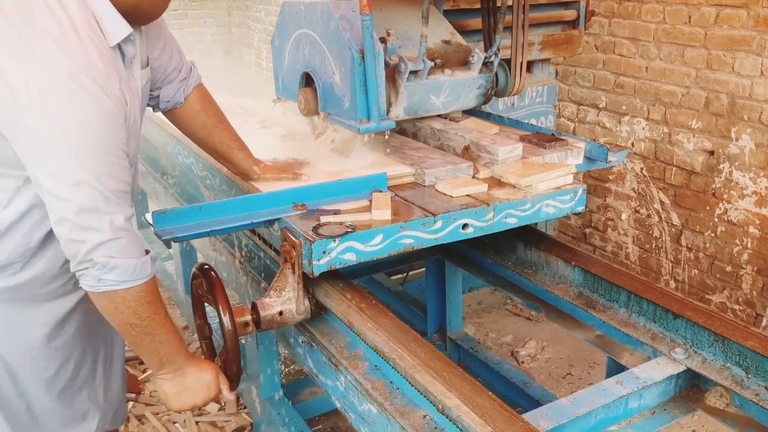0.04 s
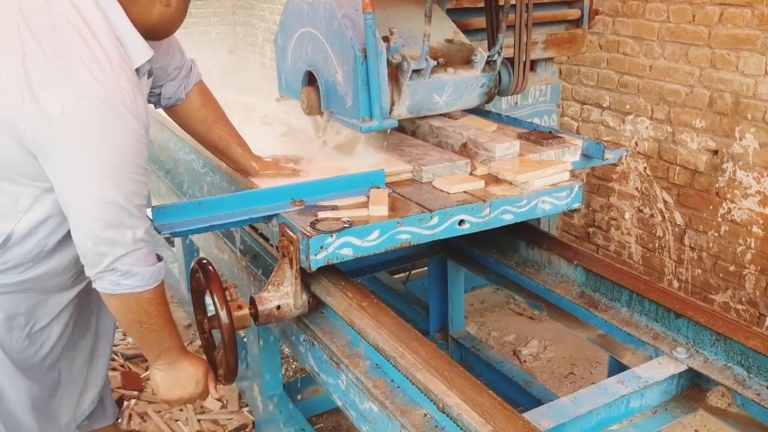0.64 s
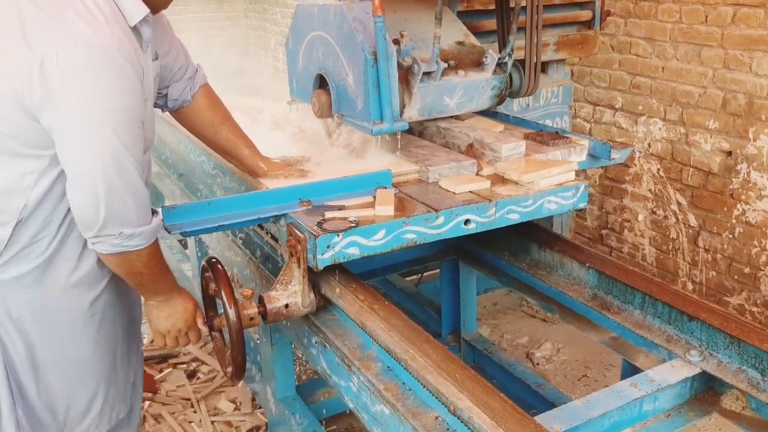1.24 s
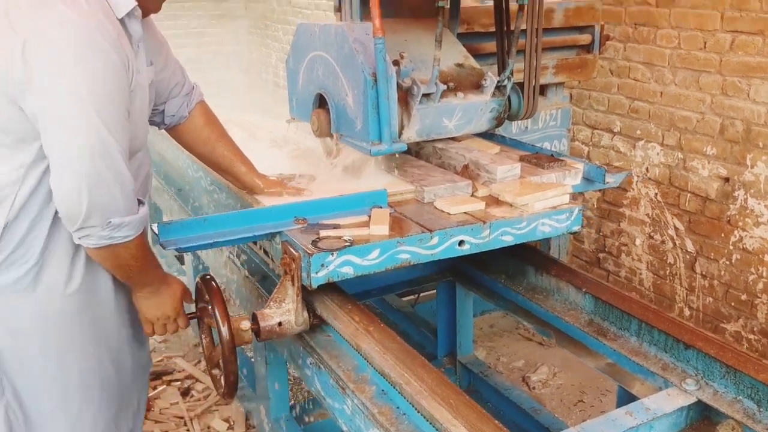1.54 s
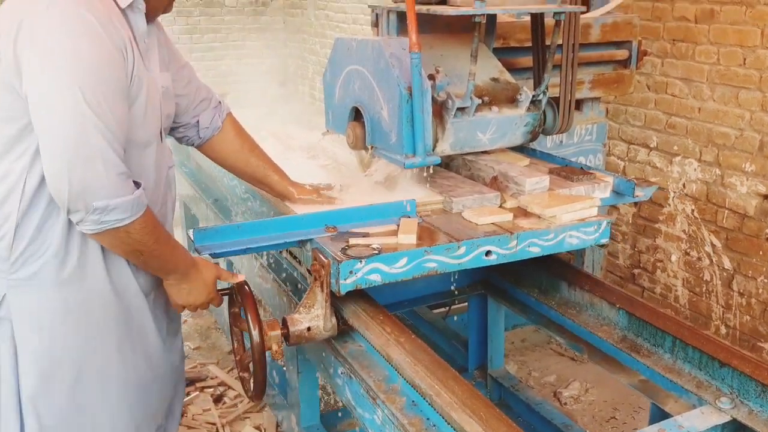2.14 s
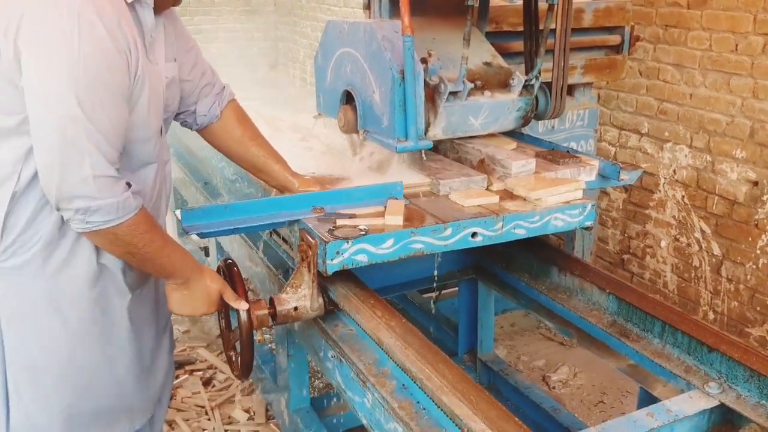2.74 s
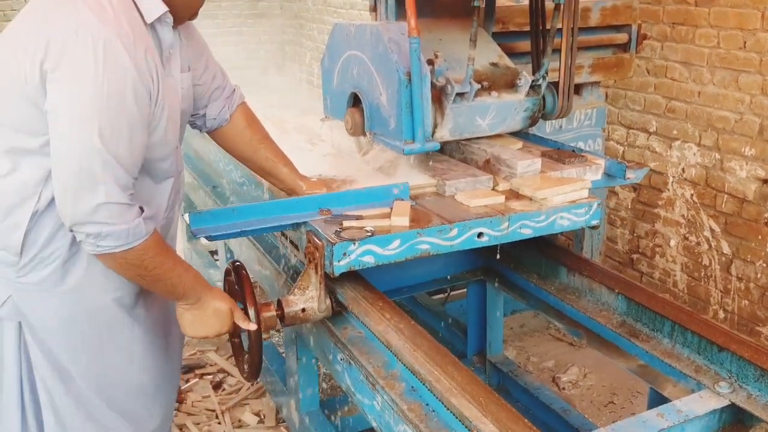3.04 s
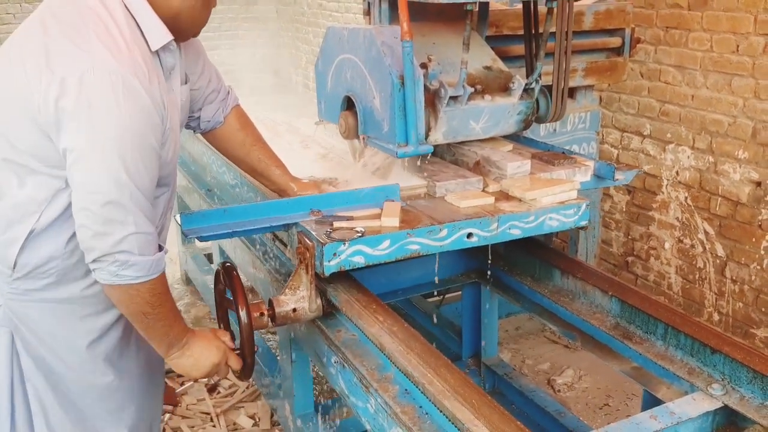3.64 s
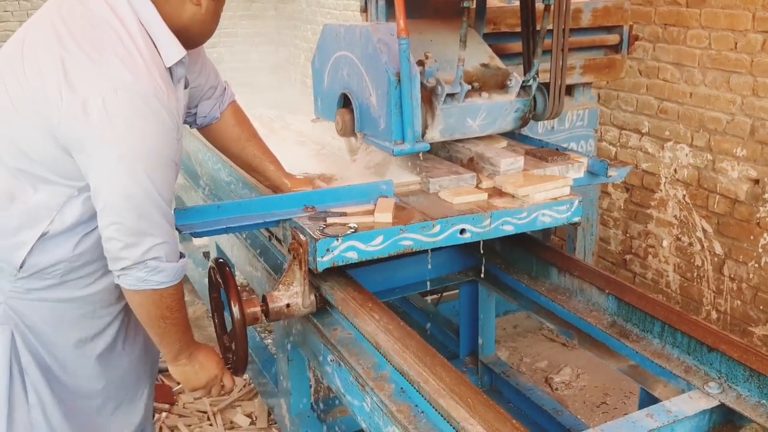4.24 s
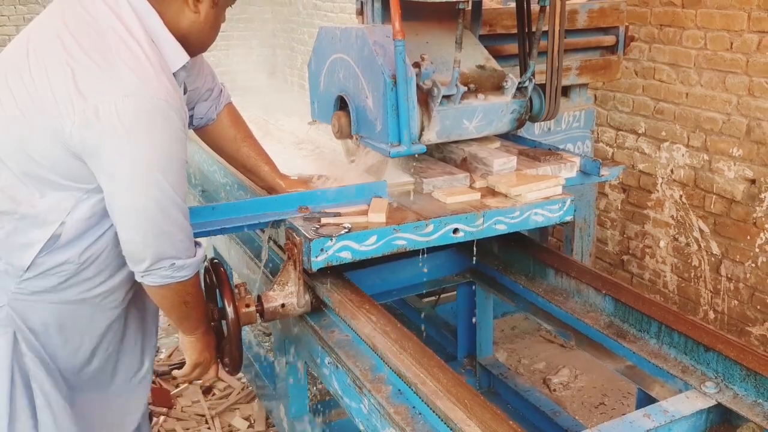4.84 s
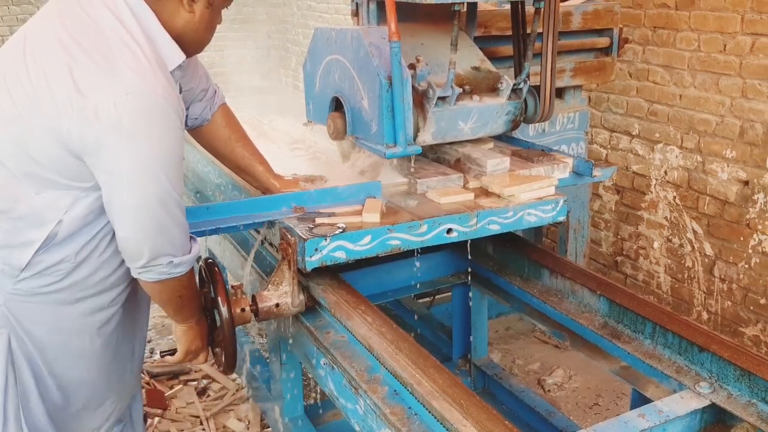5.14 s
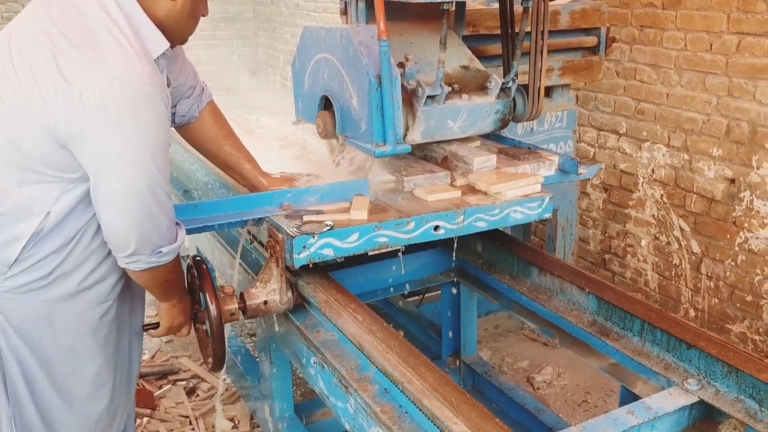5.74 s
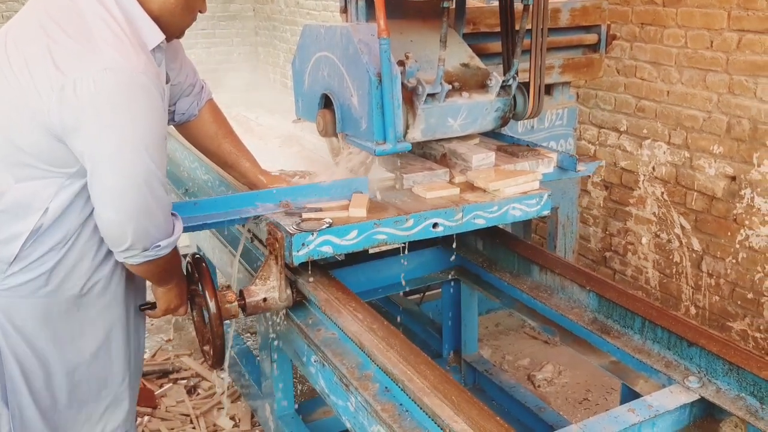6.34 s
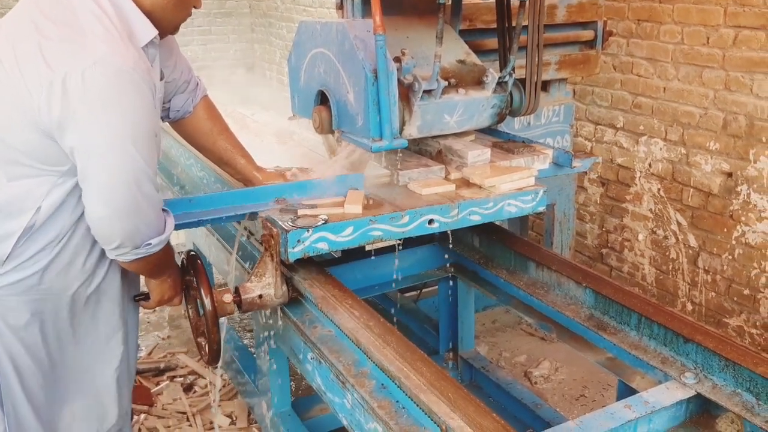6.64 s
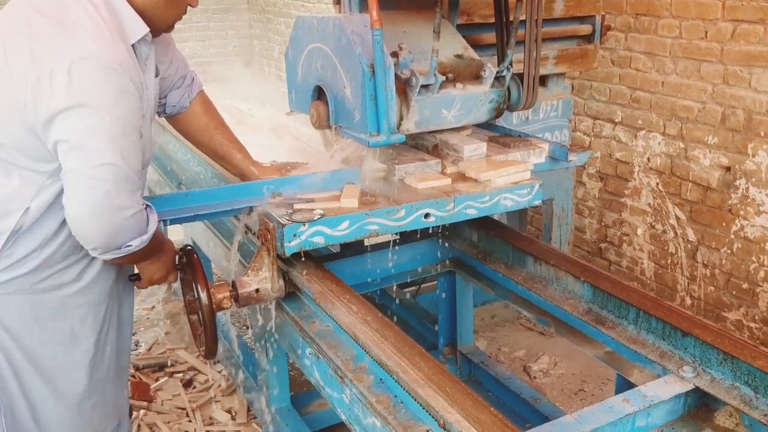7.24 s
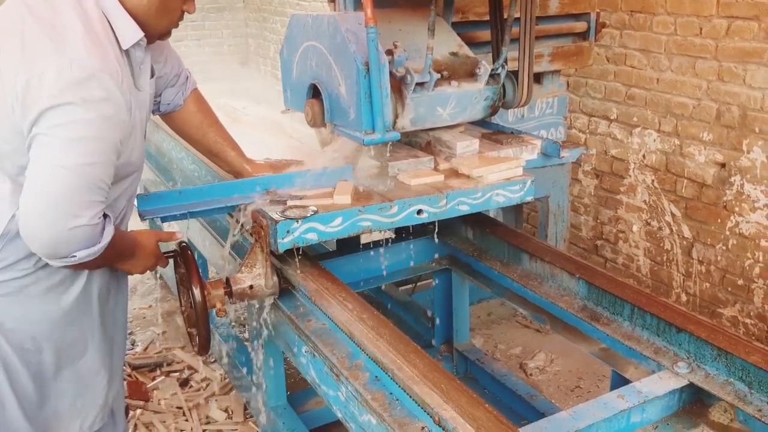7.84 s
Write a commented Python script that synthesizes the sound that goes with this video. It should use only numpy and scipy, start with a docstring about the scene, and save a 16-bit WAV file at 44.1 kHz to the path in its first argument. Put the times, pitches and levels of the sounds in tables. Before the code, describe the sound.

A water-cooled circular saw cuts tile nearby in a brick workshop, making a loud, continuous grinding hiss. The steel blade rings and screeches at shifting pitches over a hollow machine drone and fine water spray. Past the middle the load eases, the pitch rises slightly and a slowly pulsing motor whine stands out while the hiss goes on. The carriage gives a few dull knocks underneath.

```python
"""A water-cooled bridge saw is hand-fed through a tile in a brick workshop.
From the start the rim grinds a loud hiss that partly repeats each turn, the guard booms, and the steel
blade sings on multiples of its speed. The feed bites and slips; the carriage knocks now and then.
Near 3 s the load eases and the blade speeds up; each stage of the cut brings new overtones.
From 5.5 s the blade comes free and the motor's beating whine stands out. A low hum joins at 7.5 s."""
import sys
import numpy as np
from scipy import signal
from scipy.fft import rfft, irfft, next_fast_len
from scipy.io import wavfile
from scipy.ndimage import map_coordinates

SR = 44100
rng = np.random.default_rng(int(sys.argv[2]) if len(sys.argv) > 2 else 0)


def master_out(mix):
    """Clip the mix to full scale and print it as 16-bit PCM to the path in sys.argv[1]."""
    frames = np.transpose(np.atleast_2d(mix))
    ceiling = np.clip(frames, -1, 1)
    pcm = np.round(ceiling * 32767).astype(np.int16)
    wavfile.write(sys.argv[1], SR, pcm)


N = 347508
NOMINAL_RPS = 41.2  # blade speed, medium load
TOP_MULTIPLE = 185  # of blade speed

# Rim on tile: (frequency [Hz], relative density [dB])
RIM_SPECTRUM = [(1290, -25.5), (2200, -16), (2450, -7.5), (2810, -6.5), (3050, -2.5), (3370, -3),
                (3740, -4), (4830, -1), (5740, -1.5), (6210, 0), (7250, -2.5), (8600, -17), (11200, -46),
                (18900, -120)]
def grinding(turns, level_db=-20.5):
    """The diamond rim scratches the tile into a hiss."""
    return amp(level_db) * coloured(grit(turns, repeat=0.27, life_turns=28), RIM_SPECTRUM)


def grit(turns, repeat, life_turns, points=1024):
    """Two scratch noises; a share repeats each turn as the same diamonds come round and wear."""
    survival = np.exp(-1 / life_turns)
    laps = rng.standard_normal((2, int(turns[-1]) + 2, points))
    laps[:, 0] /= np.sqrt(1 - survival ** 2)  # rim starts worn in
    rim = signal.lfilter([1], [1, -survival], laps, axis=1).reshape(2, -1)
    repeating = unit(np.array([map_coordinates(side, [turns * points]) for side in rim]))
    return np.sqrt(repeat) * repeating + np.sqrt(1 - repeat) * rng.standard_normal((2, N))


# Hand bites (+) and slips (-): (time [s], length [s], gain [dB])
FEED_EVENTS = [(.11, .04, -1), (.15, .04, 0.5), (0.195, .05, -2.5), (0.608, 0.049, -3), (1.453, 0.04, -3.5),
               (2.695, 0.11, 1.2), (2.97, .04, -1.3), (3.05, .08, 1.3), (5.286, 0.11, 1.5),
               (5.8, 0.045, -1.5), (6.14, 0.032, -3), (6.39, .15, 0.2), (7.096, .06, 1.3),
               (7.23, .06, -0.2), (7.595, .06, -1), (7.73, .06, -1.7)]
def feed(turns, belt_db=0.06, belt_lap_turns=6.2, chatter_db=0.2, surge_db=0.5, crumble_db=0.72):
    """Gain from rim pressure: uneven hand, belt pull, blade swing, tile giving way."""
    t = np.arange(N) / SR
    hand = sum(db * np.exp(-(2 * (t - at) / length) ** 2) for at, length, db in FEED_EVENTS)
    belt = belt_db * np.sin(2 * np.pi * (turns / belt_lap_turns + rng.random()))
    chatter = chatter_db * np.cos(2 * np.pi * turns)
    tile = surge_db * wobble(15) + crumble_db * wobble(70)
    return amp(hand + belt + chatter + tile)


# Loud blade notes: (start [s], stop [s], multiple of speed, level [dB], left-right [dB])
BLADE_NOTES = [(0, 5.5, 11, -45, -2), (0, 1.6, 12, -45.5, -20), (0, 2.7, 16, -46, -11),
               (0, 1.4, 19, -35, 0), (0, 2.73, 25, -41.5, -9), (0, 2.9, 50, -41.5, -9),
               (0, 1.4, 75, -38, -6), (0, 2.85, 81, -42, -2), (0, 1.55, 104, -35, -10),
               (0, 1, 121, -42, -12), (0, 3.3, 119, -45, -12), (0, 3.5, 122, -31.5, -1),
               (0, 2.8, 155, -42, -12), (.1, 1.84, 149, -37, -19), (1, 1.53, 21, -33.5, -8),
               (1.4, 2.95, 100, -39, -7), (1.55, 3.1, 21, -35, -2), (1.5, 2.34, 19, -41, 2),
               (1.6, 2.9, 27, -37.5, 6), (2.85, 3.25, 24, -35, 11), (2.85, 5.5, 25, -32, -6),
               (2.9, 5.5, 16, -37.5, -2), (2.9, 6.9, 84, -38.5, -6), (3.1, 6.6, 21, -46, 6),
               (3.1, 5.5, 111, -41, -17), (3.15, 5.6, 130, -45, -15), (3.25, 5.6, 24, -38.5, 13),
               (3.3, 7.88, 27, -44, -4), (5.2, 7.2, 9, -46.5, -2), (5.25, 7.88, 74, -38.5, 10),
               (5.5, 5.85, 16, -36, 4), (5.5, 6.85, 25, -31, 8), (5.5, 6.9, 115, -39, -14),
               (5.55, 6.6, 11, -39, -2), (6.6, 7.15, 11, -35.5, -2), (5.6, 6.7, 24, -36.5, 10),
               (5.6, 6.8, 50, -39, 16), (5.85, 7.26, 16, -41, 5), (6.68, 7.1, 20, -33, -3),
               (6.85, 8.9, 25, -38, -7), (6.9, 6.2, 145, -32, -15), (7.1, 7.6, 122, -37, -14),
               (7.2, 7.88, 17, -35, -6)]
def singing(turns, trim_db=-0.5):
    """Blade modes ring on multiples of the speed; high ones flutter more."""
    out = np.zeros((2, N))
    for start, stop, multiple, db, pan_db in BLADE_NOTES:
        flutter_db = np.interp(multiple, [0, TOP_MULTIPLE], [1.66, 3.3])
        span, sound = note(turns, start, stop, multiple, db + trim_db, pan_db, flutter_db, fade_s=0.2)
        out[:, span] += sound
    return out


def note(turns, start, stop, multiple, db, pan_db, flutter_db, fade_s):
    """One fluttering blade note: sample span and sound."""
    span, envelope = swell(start, stop, fade_s)
    level = amp(db + flutter_db * wobble(14, len(envelope)))
    return span, envelope * level * tone(turns[span], multiple, multiple * NOMINAL_RPS, pan_db)


# Spray hiss: (frequency [Hz], relative density [dB])
SPRAY_SPECTRUM = [(4820, -17), (8200, -3), (8620, -2.5), (13300, 1), (15100, -1.5), (16000, -16.5)]
# Spray strength: (time [s], relative level [dB])
SPRAY_LEVEL = [(0.0, -27), (5.42, -25.5), (6.47, -27), (6.67, -25.5), (7.73, -27.5), (7.88, -24.5)]
def spray(turns, level_db=-25.5):
    """The rim flings off water and slurry."""
    flow_db = curve(SPRAY_LEVEL)
    mist = coloured(grit(turns, repeat=0.086, life_turns=12), SPRAY_SPECTRUM)
    return amp(level_db + flow_db - flow_db.mean()) * mist


# Steel disc: (frequency [Hz], relative density [dB])
DISC_SPECTRUM = [(1200, -32.5), (1680, -18), (1830, -0.5), (1920, -9.5), (2015, 1), (2140, -3), (2240, -6),
                 (2500, -4), (3200, -35)]
def rubbing(turns, rps, level_db=-33, db_per_rps=2, wander_db=2.2):
    """The blade's flank rubs the slot, louder with speed."""
    db = level_db + db_per_rps * (rps - NOMINAL_RPS) + wander_db * wobble(12)
    return amp(db) * coloured(grit(turns, repeat=0.36, life_turns=29), DISC_SPECTRUM)


# Blade guard: (frequency [Hz], relative density [dB])
GUARD_SPECTRUM = [(400, -58), (610, -24), (670, -8.5), (730, -12), (810, -5), (930, -3), (1020, -4.5),
                  (1130, -5.5), (1300, -14), (1470, -9), (1650, -11.5), (2300, -43)]
# Guard boom: (time [s], level [dB])
GUARD_LEVEL = [(0, -35.5), (.9, -36), (1.2, -36.5), (2.6, -35), (3.05, -36), (3.3, -36.5), (4.8, -35.5),
               (5.75, -34.5), (7, -33), (7.25, -36), (7.88, -33)]
def guard(turns, trim_db=4, runout_db=1.5):
    """The slightly bent blade rubs once a turn and rings its guard."""
    pulse = unit(amp(runout_db * np.cos(2 * np.pi * turns)))
    boom = coloured(grit(turns, repeat=0.35, life_turns=83), GUARD_SPECTRUM)
    return amp(curve(GUARD_LEVEL) + trim_db) * pulse * boom


# Tile and disc modes: (start [s], stop [s], frequency [Hz], width [Hz], level [dB])
SCREECHES = [(0, .55, 4960, 120.6, -32), (.75, 1.4, 4250, 70, -37), (1, 1.45, 1015, 110, -32),
             (1.601, 2.65, 4930, 80.5, -35), (1.998, 3, 4240, 121, -36), (2.602, 3.1, 4950, 100, -29),
             (2.902, 3.197, 1016, 129.6, -30), (3.7, 5.305, 3410, 110, -41.5), (3.899, 5.5, 6270, 171, -34),
             (4.2, 5.6, 5400, 110.8, -34.5), (5.104, 6.2, 1271, 69.9, -38), (4.901, 6.699, 904, 139.6, -37),
             (5.2, 6.3, 3480, 201, -36), (5.7, 7.1, 2020, 59.9, -38), (6.65, 7.05, 3420, 119, -31),
             (6.95, 7.35, 6150, 170, -30), (7.002, 7.3, 5560, 397, -29)]
def screeching():
    """Damped modes, driven by the grinding, ring as narrow rough bands."""
    out = np.zeros((2, N))
    for start, stop, hz, width_hz, db in SCREECHES:
        span, envelope = swell(start, stop, fade_s=0.2)
        count = len(envelope)
        roughness = wobble(width_hz, count) + 1j * wobble(width_hz, count)
        ring = roughness * np.exp(2j * np.pi * hz * np.arange(count) / SR)
        lead = np.array([[np.exp(1j * at_hz(PHASE_LEAD, hz))], [1]])
        out[:, span] += envelope * amp(db) * pan(at_hz(BALANCE, hz)) * np.real(lead * ring)
    return out


# Blade speed by load: (heavy [rev/s], medium [rev/s], light [rev/s])
LOAD_RPS = [40.75, 41.2, 41.9]
# Drive tones by load: (multiple of speed, heavy [dB], medium [dB], light [dB], left-right [dB])
MOTOR_TONES = [(8.82, -55.2, -51.1, -44.1, -6.3), (18.63, -55.8, -47.1, -42.9, -1.4),
               (24.47, -45, -38.5, -41.5, -1.3), (25.55, -42.0, -39.9, -48.2, 0.2),
               (28.45, -46.0, -42.4, -36.5, -3.3), (30.45, -44.5, -39, -32.3, 2.5),
               (33.36, -45.2, -37.6, -44.7, 2.2), (35.39, -37.3, -35.3, -35.3, 1.5),
               (43.2, -43, -45.7, -48.4, -9.1), (45.13, -42.7, -45.5, -47.1, -6.0),
               (48.13, -46.9, -41.4, -38.4, 2.0), (48.7, -46.1, -38.2, -45.2, 5.0)]
def motor(turns, rps, flutter_db=1.2):
    """Motor and belt tones follow the load."""
    out = np.zeros((2, N))
    for multiple, *load_db, pan_db in MOTOR_TONES:
        level = amp(np.interp(rps, LOAD_RPS, load_db) + flutter_db * wobble(7))
        out += level * tone(turns, multiple, multiple * NOMINAL_RPS, pan_db)
    return out


def whine(turns, rps, loaded_db=-37.5, free_db=-28.5, db_per_rps=9,
          beat_db=4.1, beat_s=0.92, crest_s=6.75):
    """The motor's slot tone grows to a slowly beating whine as the blade comes free."""
    free = np.interp(rps, [41.45, 41.7], [0, 1])
    beat = beat_db * np.cos(2 * np.pi * (np.arange(N) / SR - crest_s) / beat_s)
    running_db = free_db + db_per_rps * (rps - LOAD_RPS[2]) + beat
    db = (1 - free) * loaded_db + free * running_db + 0.1 * wobble(11)
    return amp(db) * tone(turns, multiple=23.55, hz=990, pan_db=-10 * free)


# Stages of the cut: (start [s], stop [s], overtone base level [dB])
CUT_STAGES = [(0, 1.5, -41.5), (1.55, 2.8, -44.5), (3, 5.55, -40.5), (5.55, 7.1, -43), (7.1, 11, -43)]
def overtones(turns, count=16, lowest_multiple=72, scatter_db=0.6):
    """Faint blade notes between the loud ones, coloured like the grinding, redrawn each stage."""
    out = np.zeros((2, N))
    vacant = np.setdiff1d(np.arange(lowest_multiple, TOP_MULTIPLE), [row[2] for row in BLADE_NOTES])
    for start, stop, stage_db in CUT_STAGES:
        for group in np.array_split(vacant, count):
            multiple = rng.choice(group)
            hz = multiple * NOMINAL_RPS
            db = stage_db + at_hz(RIM_SPECTRUM, hz) + rng.normal(0, scatter_db)
            pan_db = at_hz(BALANCE, hz) - 2
            span, sound = note(turns, start, stop, multiple, db, pan_db, flutter_db=4, fade_s=0.28)
            out[:, span] += sound
    return out


# Carriage knocks: (time [s], level [dB])
KNOCK_EVENTS = [(0.339, -32), (0.451, -33), (0.691, -28), (1.74, -30), (2.17, -28), (2.39, -31),
                (5.39, -27), (6.779, -19.5), (7.16, -28), (7.26, -27)]
# Carriage modes: (frequency [Hz], relative level [dB], T60 [s])
CARRIAGE_MODES = [(44, -19, .16), (66, -3, .14), (94, -6.5, 0.14), (128, 2, 0.13), (174, 2, 0.043),
                  (242, 3, 0.095), (334, -6, .06)]
def knocks(trim_db=-9, attack_s=0.001, scatter_db=2.2, pan_db=-7):
    """The carriage thuds on its rails, ringing its low modes at new strengths each time."""
    out = np.zeros(N + SR)
    t = np.arange(SR // 3) / SR
    attack = 1 - np.exp(-t / attack_s)
    for at, db in KNOCK_EVENTS:
        ring = np.zeros(len(t))
        for hz, mode_db, t60 in CARRIAGE_MODES:
            decay = amp(mode_db + rng.normal(0, scatter_db) - 60 * t / t60)
            ring += decay * np.sin(2 * np.pi * (hz * t + rng.random()))
        out[round(at * SR):][:len(t)] += amp(db + trim_db) * attack * ring
    return out[:N] * pan(pan_db)


# Frame and belts: (frequency [Hz], relative density [dB])
FRAME_SPECTRUM = [(18, -65), (32, -40), (60, -20), (97, -6), (150, -11.5), (200, -3.5), (245, 1.5),
                  (300, -1.5), (345, -3), (420, -2), (520, -6), (600, -7), (700, -3.5), (1000, -53)]
def frame(turns, rps, level_db=-37, db_per_rps=0.2, shake_db=1):
    """Steel frame and belts rumble, slightly louder with speed."""
    db = level_db + db_per_rps * (rps - NOMINAL_RPS) + shake_db * wobble(5)
    return amp(db) * coloured(grit(turns, repeat=0.21, life_turns=98), FRAME_SPECTRUM)


def hum(start_s=7.55, hz=100, level_db=-49):
    """A low hum sets in at the end."""
    out = np.zeros((2, N))
    span, envelope = swell(start_s, N / SR, fade_s=0.17)
    cycles = hz * np.arange(len(envelope)) / SR
    out[:, span] = amp(level_db) * envelope * tone(cycles, 1, hz, pan_db=-7)
    return out


# Room decay: (frequency [Hz], T60 [s])
WALL_DECAY = [(200, 0.41), (2000, 0.31), (12000, 0.05)]
def walls(x):
    """Brick walls reverberate; treble dies first."""
    hz, t, spectra = signal.stft(rng.standard_normal((2, SR // 2)), SR, nperseg=256)
    decay = amp(-60 * t / at_hz(WALL_DECAY, hz)[:, None])
    tail = signal.istft(spectra * decay, SR, nperseg=256)[1]
    return signal.fftconvolve(x, tail / np.linalg.norm(tail[0]), axes=1)[:, :N]


# Narrow peaks and notches in the hiss: (centre [Hz], width [Hz], gain [dB])
HISS_RIPPLE = [(2460, 110, 1.5), (2750, 60, 0), (3650, 81, -1.5), (4420, 52, -0.5), (4970, 170, 0.5),
               (7080, 690, 1), (8030, 130, 3), (8240, 160, -3), (8700, 170, -4), (9080, 170, 0.5),
               (9260, 110, -1.5)]
# Stereo balance: (frequency [Hz], left-right [dB])
BALANCE = [(60, -5.5), (500, -6), (700, -3.5), (1000, -4), (2000, -3), (2500, -4.5), (3600, -4.5),
           (4300, -9), (5200, -13), (6500, -11), (7300, -6.5), (8000, -1.5), (10000, -1.5), (13300, -5.5),
           (15000, -2.5)]
# Stereo likeness: (frequency [Hz], left-right correlation)
CORRELATION = [(60, 0.32), (250, 0.92), (520, 0.4), (680, 0.34), (900, 0.44), (1050, -0.33), (1200, -0.12),
               (1290, 0.1), (1430, 0.3), (1800, 0.00026), (2450, 0.41), (2800, 0.023), (4200, 0.06),
               (5100, -0.16), (6800, -0.26), (8000, 0.05), (15000, 0)]
def coloured(pair, spectrum):
    """Two independent noises, shaped and spread in stereo; mid at rms 1."""
    size = next_fast_len(N, real=True)
    hz = np.fft.rfftfreq(size, 1 / SR)
    alike = np.clip(at_hz(CORRELATION, hz), -0.9, 0.9)
    sides = pan(at_hz(BALANCE, hz))
    ripple_db = sum(db * np.exp(-((hz - centre) / width) ** 2) for centre, width, db in HISS_RIPPLE)
    colour = amp(at_hz(spectrum, hz) + ripple_db) / np.sqrt((sides ** 2).sum(0) + 2 * alike)
    common, opposed = rfft(pair, size) * colour * np.sqrt([1 + alike, 1 - alike])
    out = irfft(sides * [common + opposed, common - opposed], size)[:, :N]
    return out / out.mean(0).std()


# Stereo phase of a steady tone, walls included: (frequency [Hz], left lead [rad])
PHASE_LEAD = [(370, -.5), (460, .5), (490, -1.3), (660, -.3), (720, 0), (780, 1.1), (990, .9), (1030, -.4),
              (1200, 2.4), (1265, 0), (1400, -2.5), (1480, -2.2), (1760, -.2), (2100, .3), (3050, 1.6),
              (3460, -.3), (4570, .2), (4960, 1.8), (6100, 2.2)]
def tone(turns, multiple, hz, pan_db):
    """Stereo sine at a multiple of turns; hz sets only the left lead."""
    phase = 2 * np.pi * (multiple * turns + rng.random())
    return np.sqrt(2) * pan(pan_db) * np.sin([phase + at_hz(PHASE_LEAD, hz), phase])


def swell(start, stop, fade_s):
    """Sample span and soft envelope; no fade at the scene's edges."""
    half = fade_s / 2
    first = start if start > half else -fade_s
    last = stop if stop < N / SR - half else N / SR + fade_s
    span = slice(max(int((first - half) * SR), 0), min(int((last + half) * SR), N))
    t = np.arange(span.start, span.stop) / SR
    ramp = np.clip(np.minimum(t - first, last - t) / fade_s + 0.5, 0, 1)
    return span, np.sin(np.pi / 2 * ramp)


def wobble(rate_hz, count=N):
    """Smooth random curve with knots at rate_hz."""
    coarse = np.linspace(0, count, int(8 * rate_hz * count / SR) + 2)
    knots = rng.standard_normal(int(count * rate_hz / SR) + 4)
    return np.interp(np.arange(count), coarse, map_coordinates(knots, [coarse * rate_hz / SR]))


def curve(points):
    """(time, value) points, read per sample."""
    return np.interp(np.arange(N) / SR, *np.transpose(points))


def at_hz(points, hz):
    """(frequency, value) points, read on a log axis."""
    freqs, values = np.transpose(points)
    return np.interp(np.log1p(hz), np.log1p(freqs), values)


def pan(db):
    """Left-right dB to two channel gains."""
    return np.vstack([amp(db / 2), amp(-db / 2)])


def amp(db):
    """dB to gain."""
    return 10 ** (db / 20)


def unit(x):
    """Scale to rms 1."""
    return x / np.sqrt(np.mean(x ** 2) + 1e-20)


# Spindle: (time [s], speed [rev/s])
BLADE_SPEED = [(0, 40.72), (1.2, 40.86), (1.7, 40.69), (2.1, 40.72), (2.5, 40.63), (2.8, 40.82),
               (3.02, 41.16), (3.5, 41.14), (4.05, 41.23), (4.5, 41.1), (4.8, 41.22), (5, 41.15),
               (5.4, 41.35), (5.8, 41.76), (6.3, 41.82), (7, 41.94), (7.2, 42.1), (7.88, 42.25)]
def scene(room_db=-12, jitter_rps=0.01547):
    """One spindle speed drives the saw's hiss, notes and motor."""
    rps = curve(BLADE_SPEED)
    turns = np.cumsum(rps + jitter_rps * wobble(8)) / SR
    cut = feed(turns) * (grinding(turns) + spray(turns) + rubbing(turns, rps))
    body = cut + guard(turns) + knocks() + frame(turns, rps) + hum()
    tones = singing(turns) + screeching() + motor(turns, rps) + whine(turns, rps) + overtones(turns)
    return body + tones + amp(room_db) * walls(body)


def record(dry, cutoff_hz=15750):
    """Brick-wall low-pass."""
    size = next_fast_len(N + SR // 4)
    passband = np.fft.rfftfreq(size, 1 / SR) < cutoff_hz
    return irfft(rfft(dry, size) * passband, size)[:, :N]


dry = scene()
out = record(dry)
master_out(out)
```